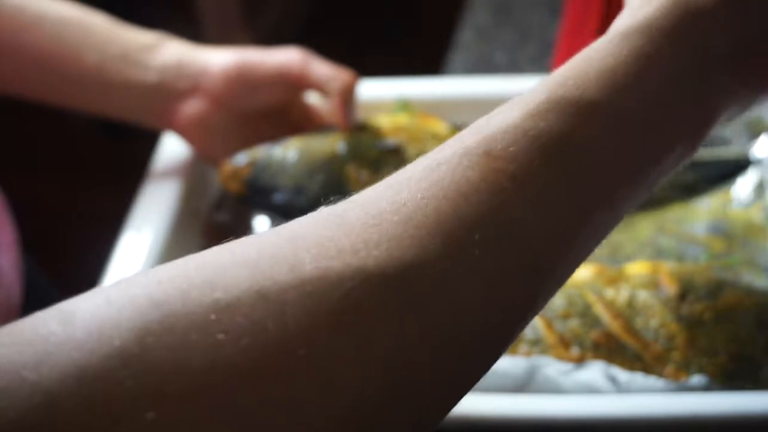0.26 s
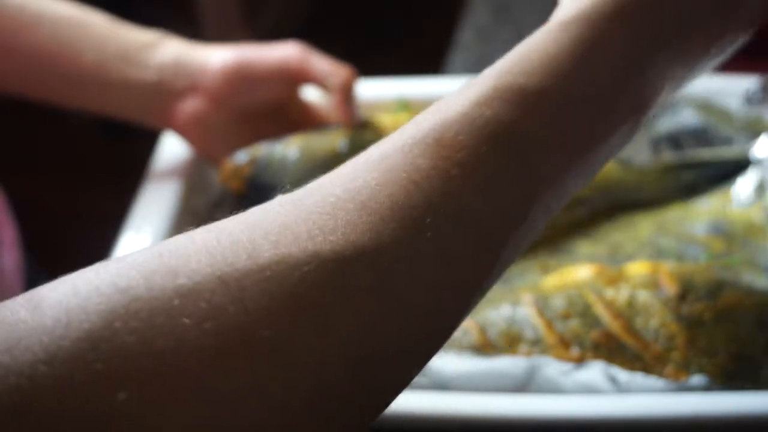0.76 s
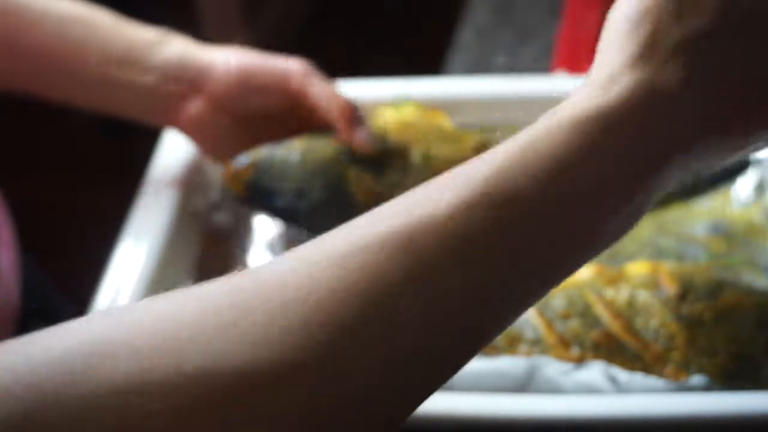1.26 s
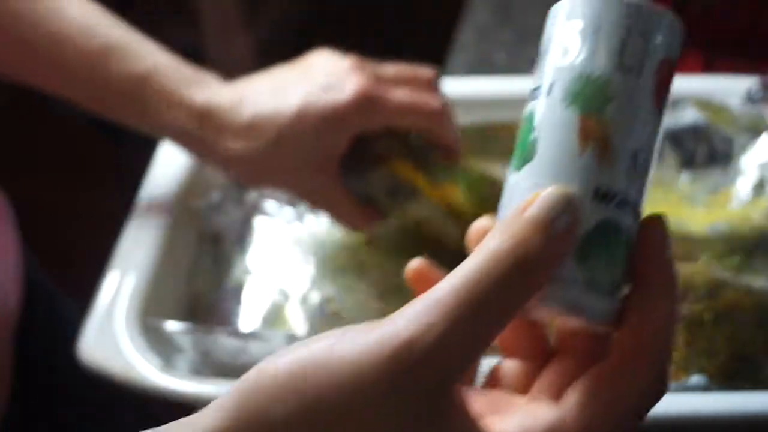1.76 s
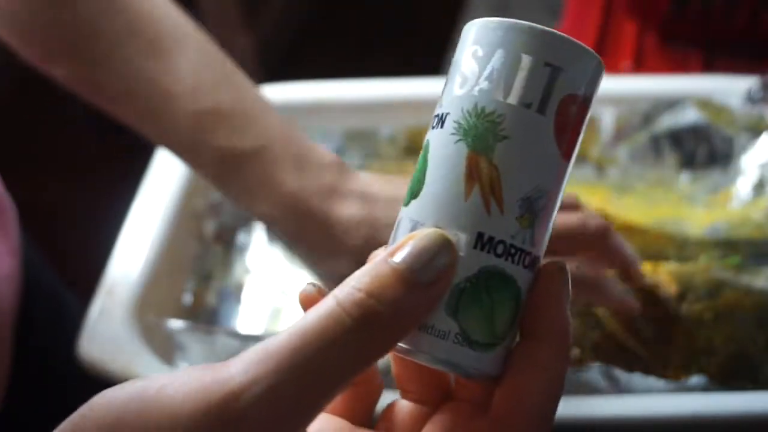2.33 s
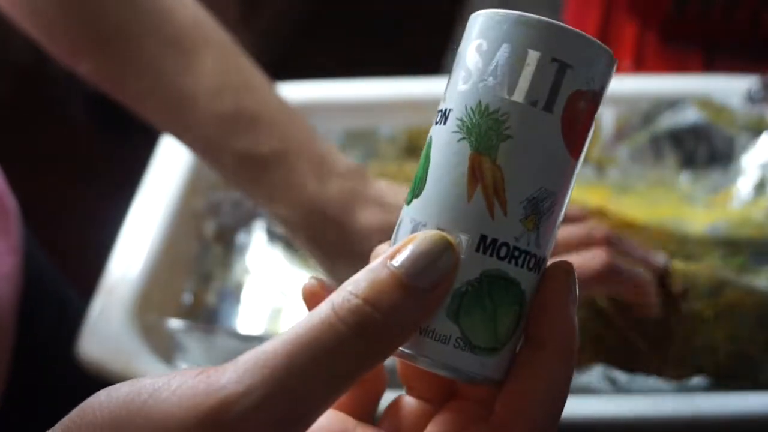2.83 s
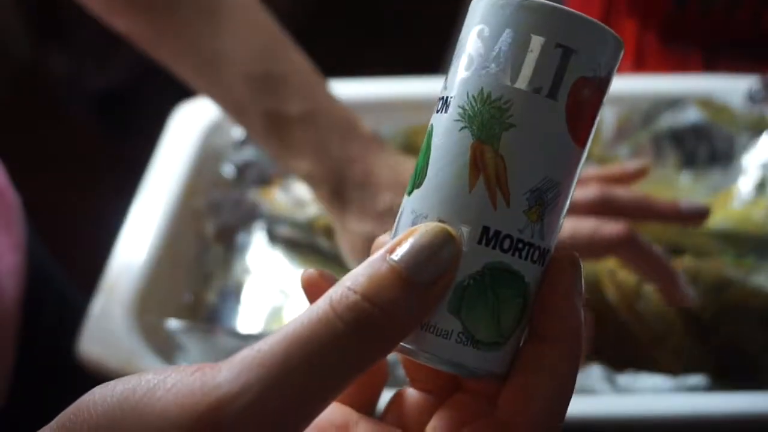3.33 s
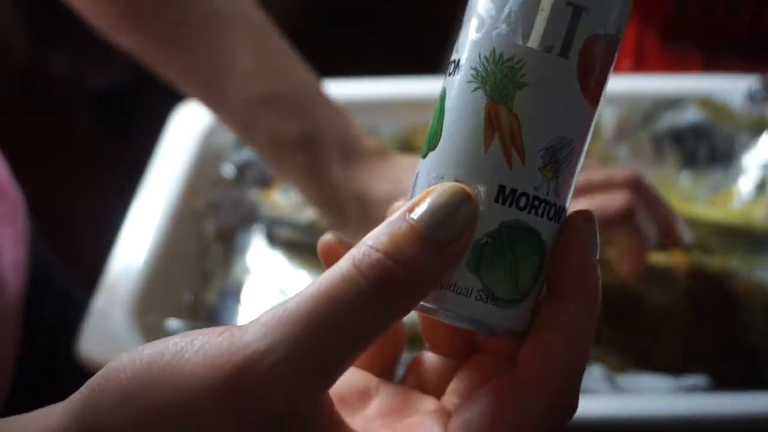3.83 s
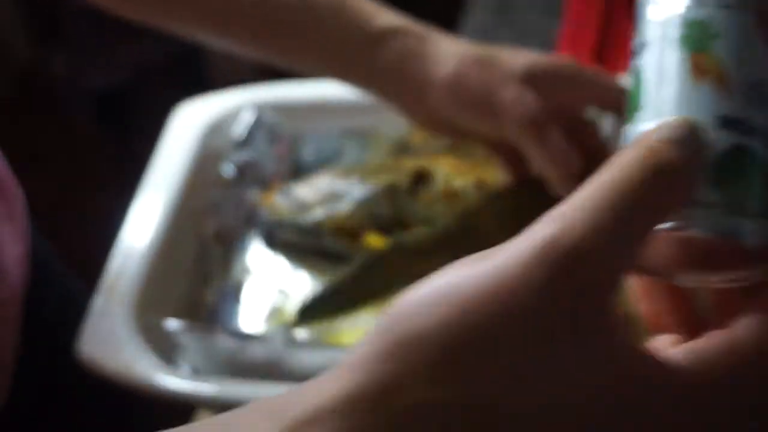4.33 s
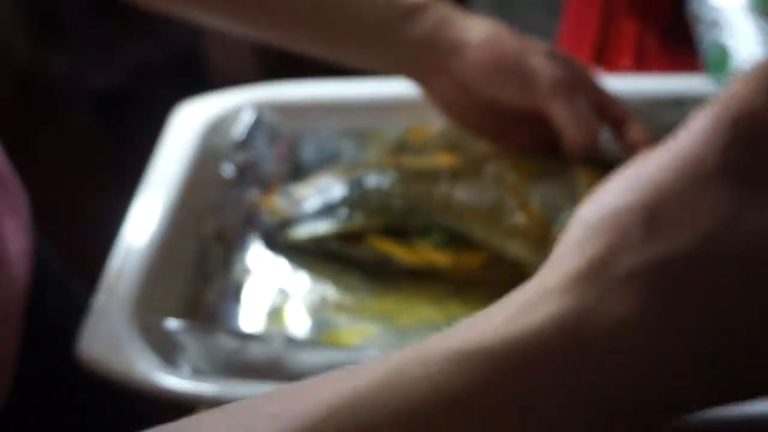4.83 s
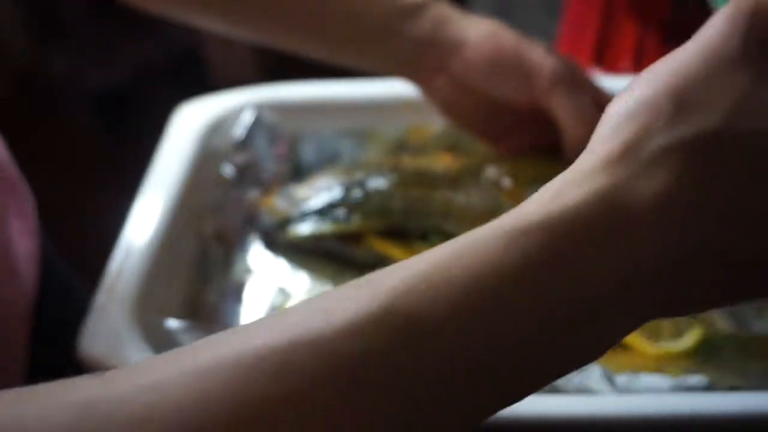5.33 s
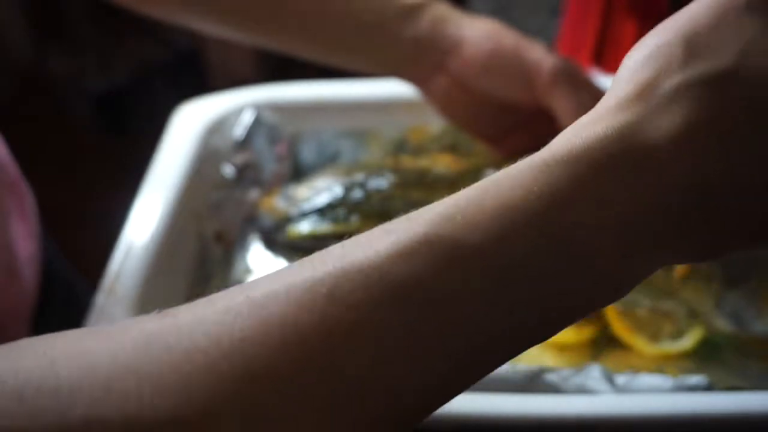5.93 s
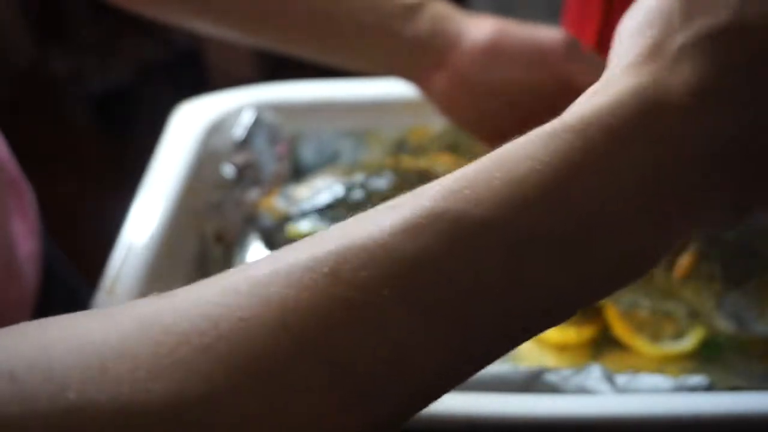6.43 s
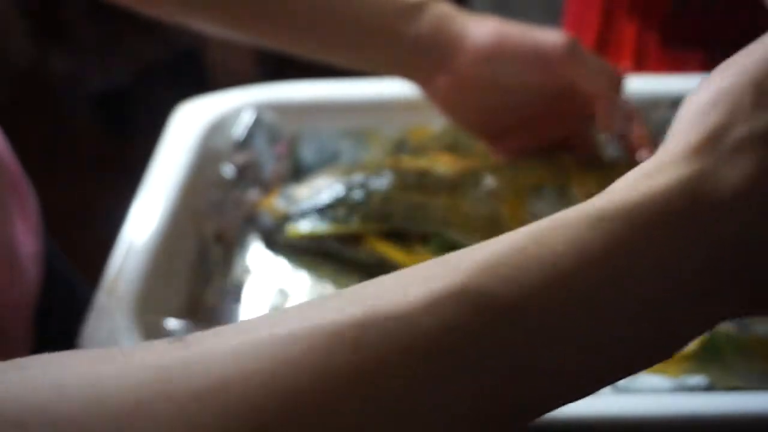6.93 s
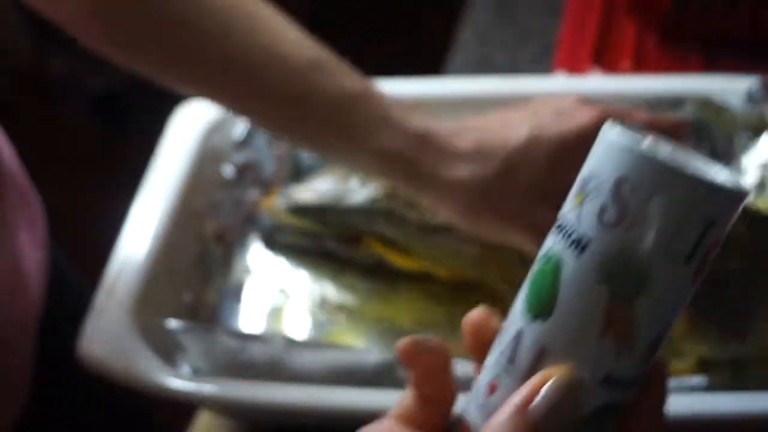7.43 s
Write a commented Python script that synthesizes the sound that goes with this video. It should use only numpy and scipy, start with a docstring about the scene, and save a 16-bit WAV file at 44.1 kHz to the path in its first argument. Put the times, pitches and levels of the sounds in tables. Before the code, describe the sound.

Close kitchen sounds: rhythmic bright salt shaking, crackling wet foil and a heavy soft fish thud, another run of shaking, over a steady appliance hum.

```python
"""In a small kitchen, close by, salt is shaken from a canister over a fish in a foil-lined baking dish.
Grains are dense trains of random impacts: they swish along the canister and slam against its end.
A hand turns the fish twice: the wet foil rustles and snaps as creases excite short facet resonances,
trapped air rings in decaying sines, and the fish drops with a dull slap that wakes the modes of the dish.
An appliance hums in harmonics of its motor's running speed, over rushing air and a low, swelling rumble."""
import sys
import numpy as np
from scipy import signal
from scipy.fft import rfft, irfft, next_fast_len
from scipy.io import wavfile

SR = 44100
rng = np.random.default_rng(int(sys.argv[2]) if len(sys.argv) > 2 else 0)


def transcribe(signal):
    """Save signal, clipped to [-1, 1], as a 16-bit WAV file at the path in sys.argv[1]."""
    frames = np.atleast_2d(signal).T
    limited = np.clip(frames, -1, 1)
    pcm = np.round(limited * 32767).astype(np.int16)
    wavfile.write(sys.argv[1], SR, pcm)


N = 338247
TIME = np.arange(N) / SR


def from_db(db):
    """Decibel law: a level becomes an amplitude factor."""
    return 10 ** (np.asarray(db) / 20)


def rms_one(x):
    """Normalisation to unit effective value."""
    return x / np.sqrt(np.mean(x ** 2) + 1e-20)


def level_at(points, s):
    """Linear interpolation of a (time, level) table."""
    return np.interp(s, *np.transpose(points))


def at_hz(points, hz):
    """Linear interpolation of a spectrum on a logarithmic frequency axis."""
    table_hz, value = np.transpose(points)
    return np.interp(np.log(hz + 1e-3), np.log(table_hz), value)


def drift(per_s):
    """Slow random modulation with a spread of 1, joining chance values by straight lines."""
    knots = rng.standard_normal(4000)
    return np.interp(TIME * per_s, np.arange(len(knots)), knots) * np.sqrt(3 / 2)


def hump(s, db, half_s):
    """Gaussian envelope: a smooth swell around a moment."""
    return from_db(db) * np.exp(-np.minimum(((TIME - s) / half_s) ** 2, 50))


def colour(x, spectrum, likeness):
    """Interaural coherence: unrelated mid and side noises are shaped, then weighted to set the likeness."""
    size = next_fast_len(x.shape[1])
    hz = np.arange(size // 2 + 1) * SR / size
    alike = np.clip(at_hz(likeness, hz), -.99, .99)
    mid, side = rfft(x, size) * rms_one(from_db(at_hz(spectrum, hz)))
    mid = mid * np.sqrt((1 + alike) / 2)
    side = side * np.sqrt((1 - alike) / 2)
    return irfft(np.array([mid + side, mid - side]), size)[:, :x.shape[1]]


def grains(per_s, spread_db):
    """Shot noise: tiny impacts of uneven size at random moments, with unrelated strengths in two signals."""
    sizes = from_db(spread_db * np.minimum(rng.exponential(1, N), 4))
    return rms_one((rng.random(N) < per_s / SR) * sizes * rng.standard_normal((2, N)))


def resonate(x, hz, width_hz):
    """Damped resonator: a two-pole filter with gain 1 at its peak."""
    r = np.exp(-np.pi * width_hz / SR)
    feedforward = [(1 - r * r) / 2, 0, (r * r - 1) / 2]
    feedback = [1, -2 * r * np.cos(2 * np.pi * hz / SR), r * r]
    return signal.lfilter(feedforward, feedback, x)


def add(track, s, sound):
    """Superposition: a sound is mixed in at a given time."""
    start = max(int(s * SR), 0)
    track[..., start:start + sound.shape[-1]] += sound[..., :N - start]


def panned(x, left_db):
    """Level difference as a cue to direction: left_db is left minus right."""
    return x * from_db([[left_db / 2], [-left_db / 2]])


# Harmonics of the motor hum: (multiple of the running speed, relative level [dB])
MOTOR_HARMONICS = [(1, -25.5), (2, -32.5), (3, -27.5), (4, -20.5), (5, -7), (6, 0.5), (7, 0.5), (8, -7),
                   (9, -19.5), (11, -10.5), (13, -10), (14, -20.5)]
# Loudness of the hum: (time [s], level [dB])
MOTOR_LOUDNESS = [(0, -41.5), (1.4, -39.5), (2.2, -43), (3, -41.5), (4.4, -39), (5.5, -40), (6.7, -39.5),
                  (7.67, -40.5)]
# Other steady tones of the appliance: (frequency [Hz], mean rms level [dB])
APPLIANCE_TONES = [(91.5, -61.5), (220.5, -53), (721, -51.5)]
MOTOR_HZ = 59.285  # mean running speed


def motor(waver_db=.5, tone_waver_db=1.0, slip_turns=.004, smear_rad=0.206):
    """Fourier series of one knock per turn: the housing smears the phases, and the hum throbs once a turn."""
    turns = (TIME - .0043) * MOTOR_HZ
    turns = turns + slip_turns * drift(2.07)
    hum = 0
    for k, db in MOTOR_HARMONICS:
        phase = 2 * np.pi * k * turns + smear_rad * (k - 6.5) ** 2
        hum = hum + from_db(db + waver_db * drift(1.82)) * np.cos(phase)
    tones = 0
    for hz, db in APPLIANCE_TONES:
        level = from_db(db + tone_waver_db * drift(1.91))
        tones = tones + level * np.sin(2 * np.pi * hz * TIME + .5 * drift(2.05))
    # the square root of 2 turns rms levels into peak amplitudes
    return np.sqrt(2) * (from_db(level_at(MOTOR_LOUDNESS, TIME)) * hum + tones)


# Spectrum of the rushing air: (frequency [Hz], relative density [dB per Hz])
AIR_SPECTRUM = [(20, -55), (50, -29), (100, -9), (170, -2), (240, 0), (380, 3.5), (520, -1), (780, -4.5),
                (1050, -9.5), (2000, -14.5), (3500, -22), (6000, -23), (8000, -26), (16000, -29)]
# Spectrum of the low rumble: (frequency [Hz], relative density [dB per Hz])
RUMBLE_SPECTRUM = [(15, -16), (30, -15), (48, 18), (65, 14), (100, -10), (250, -50)]
# Left-right likeness of the diffuse background: (frequency [Hz], correlation)
DIFFUSE_LIKENESS = [(30, .99), (70, .96), (300, 0.86), (700, 0.6), (1500, 0.44), (3000, 0), (7000, 0)]
# Rumble between its swells: (time [s], relative level [dB])
RUMBLE_FLOOR = [(0, -58), (1.4, -63), (2.1, -70), (3, -58), (7.67, -57.5)]
# Swells of the rumble: (middle [s], relative level [dB], half length [s])
RUMBLE_SWELLS = [(2.83, -52, .07), (3.32, -44, 0.11), (3.78, -47.5, .17), (4.91, -46, 0.1),
                 (5.95, -53, .08), (6.32, -53, .07), (6.92, -50.5, 0.23)]


def room_tone(air_db=-39.0, rumble_db=-3.5):
    """Broadband flow noise: the appliance's air rushes steadily over a low rumble that comes and goes."""
    air = from_db(air_db) * colour(rng.standard_normal((2, N)), AIR_SPECTRUM, DIFFUSE_LIKENESS)
    swell = from_db(level_at(RUMBLE_FLOOR, TIME)) + sum(hump(*row) for row in RUMBLE_SWELLS)
    rumble = swell * colour(rng.standard_normal((2, N)), RUMBLE_SPECTRUM, DIFFUSE_LIKENESS)
    return air + from_db(rumble_db) * rumble


def kitchen(x, crossover_hz=5000, t60_s=0.32, treble_t60_s=0.27, treble_db=-1.5):
    """Diffuse reverberation: exponentially dying noise, unrelated on the two sides; the treble dies first."""
    age = TIME[:SR // 2]
    white = rng.standard_normal((2, len(age))) * np.minimum(age / 0.0035, 1)
    low_pass = signal.butter(2, crossover_hz, "low", fs=SR, output="sos")
    high_pass = signal.butter(2, crossover_hz, "high", fs=SR, output="sos")
    dull, bright = signal.sosfilt(low_pass, white), signal.sosfilt(high_pass, white)
    fade = from_db(-60 * age / t60_s)
    # the minus sign keeps the two bands from cancelling at the crossover
    tail = dull * fade - bright * from_db(treble_db - 60 * age / treble_t60_s)
    return signal.fftconvolve(x, tail / np.sqrt(np.sum(fade ** 2)), axes=1)[:, :N]


# Left-right likeness of all close sources: (frequency [Hz], correlation)
CLOSE_LIKENESS = [(300, 1), (1300, 0.58), (2500, 0.96), (4000, -0.24), (7000, -0.19), (15000, 0.0086)]
# The fish drops into the dish: (time [s], thud level [dB], wet slap level [dB])
FISH_DROPS = [(2.344, -34, -29), (3.318, -41, -36), (4.829, -24.5, -32), (5.17, -42, -44)]
# Modes of the laden dish: (frequency [Hz], relative level [dB], 60 dB decay time [s])
DISH_MODES = [(204, -6, 0.26), (230, -3, 0.19), (352.4, 5, 0.23), (605, -1, 0.079), (640, 6.5, 0.068)]
# Spectrum of the wet slap: (frequency [Hz], relative density [dB per Hz])
SLAP_SPECTRUM = [(100, -25), (200, -14), (600, 2), (1000, 7), (1400, 1), (3000, -27), (8000, -45)]


def fish_flops(slap_decay_s=0.03, rise_s=0.0022):
    """Modal excitation: the soft weight of the fish slaps dully and wakes the low modes of the dish."""
    out, age = np.zeros((2, N)), TIME[:SR // 2]
    thud = sum(from_db(db - 60 * age / t60) * np.sin(2 * np.pi * hz * age) for hz, db, t60 in DISH_MODES)
    for s, db, slap_db in FISH_DROPS:
        noise = colour(rng.standard_normal((2, len(age))), SLAP_SPECTRUM, CLOSE_LIKENESS)
        slap = noise * np.exp(-age / slap_decay_s)
        add(out, s, (from_db(db) * thud + from_db(slap_db) * slap) * (1 - np.exp(-age / rise_s)))
    return out


# Air pockets pop under the wet fish: (time [s], starting pitch [Hz], level [dB], 60 dB decay time [s])
AIR_POPS = [(1.718, 1224, -24, .08), (2.787, 1474, -36, 0.17), (2.87, 1430, -19, 0.027),
            (2.87, 2870, -24, 0.025), (3.459, 1350, -17.5, 0.072), (3.46, 2075, -19, 0.068),
            (4.222, 1940, -25, .04), (4.491, 1685, -22.5, 0.11), (7.604, 1380, -25, 0.042)]


def air_pockets(glide_per_s=0.2, rise_s=0.0023):
    """Bubble resonance: trapped air rings as a decaying sine that rises slightly in pitch."""
    out, age = np.zeros(N), TIME[:SR // 4]
    for s, hz, db, t60 in AIR_POPS:
        # pitch, the slope of this phase, rises at twice glide_per_s
        ring = np.sin(2 * np.pi * hz * age * (1 + glide_per_s * age))
        add(out, s, from_db(db - 60 * age / t60) * np.minimum(age / rise_s, 1) * ring)
    return out


# How hard the fish drags over the foil, one list per move: lifted and turned over, laid down and
# pressed flat, rolled back, fingers shift, shift again, gripped again: (time [s], relative level [dB])
FISH_DRAG = [
    [(1.22, -35.5), (1.3, -28), (1.4, -37), (1.47, -30), (1.64, -29), (1.76, -34.5), (1.86, -23.5),
     (1.94, -30.5), (2.1, -54)],
    [(2.29, -37.5), (2.35, -31.5), (2.47, -43.5), (2.62, -43), (2.97, -49.5), (3.18, -38), (3.55, -42.5),
     (3.86, -47.5)],
    [(3.93, -41.5), (4.09, -37), (4.27, -47), (4.47, -39.5), (4.65, -43.5), (4.74, -29.5), (4.85, -31.5),
     (5.07, -51)],
    [(5.13, -49), (5.27, -41.5), (5.4, -63)],
    [(6.3, -70), (6.44, -47), (6.52, -56)],
    [(7.25, -37.5), (7.38, -31), (7.5, -71), (7.67, -33)],
]


def drag_db(s):
    """Friction level of the dragging at these times; -120 dB, practically silent, between moves."""
    moves = [np.interp(s, *np.transpose(move), left=-120, right=-120) for move in FISH_DRAG]
    return np.max(moves, axis=0)


# Spectrum of the ringing foil sheet: (frequency [Hz], relative density [dB per Hz])
SHEET_SPECTRUM = [(500, -43), (950, -19), (1350, -2.5), (1700, -3.5), (2000, -3.5), (2600, 0), (3300, -2.5),
                  (4300, -6), (5500, -17), (8000, -21.5), (16000, -49)]
# Spectrum of the bright crack of a crease: (frequency [Hz], relative density [dB per Hz])
CRACK_SPECTRUM = [(2000, -7.5), (4500, 5.5), (7000, 1), (10000, 3), (13000, -0.5), (16000, -4)]


def foil_rustle(body_db=-1.5, crack_db=-7.0, per_s=150, spread_db=1.0, decay_s=0.0098):
    """Crackling noise: many small creases yield under the wet fish, each a dying burst on tuned facets."""
    sizes = from_db(spread_db * np.minimum(rng.exponential(1, N), 3))
    creases = (rng.random(N) < per_s / SR) * sizes
    sheet = colour(rng.standard_normal((2, N)), SHEET_SPECTRUM, CLOSE_LIKENESS)
    power_decay = [1, -np.exp(-2 / (decay_s * SR))]
    facets = 0
    for hz in np.geomspace(1150, 4400, 12):
        woken = creases * (rng.random(N) < 1 / 4)  # each crease wakes a quarter of the facets on average
        bursts = np.sqrt(signal.lfilter([1], power_decay, woken ** 2 + 1e-18))
        facets = facets + bursts * resonate(sheet, hz, width_hz=hz / 8)
    crack = colour(grains(per_s=5000, spread_db=1.5), CRACK_SPECTRUM, CLOSE_LIKENESS)
    return from_db(drag_db(TIME)) * (from_db(body_db) * rms_one(facets) + from_db(crack_db) * crack)


def stray_snaps(per_s=14, above_rustle_db=11.5, spread_db=1.5, treble_db=-15.5,
                facet_hz=1900, facet_octaves=0.38):
    """Random point process: further random snaps while the fish moves, as strong as the drag allows."""
    moment = np.cumsum(rng.uniform(.2, 1.8, 300)) / per_s
    strength, pitch = np.clip(rng.standard_normal((2, len(moment))), -2, 2)
    peak = drag_db(moment) + above_rustle_db + spread_db * strength
    # columns like those of the distinct snaps
    rows = np.transpose([moment, peak, peak + treble_db, facet_hz * 2 ** (facet_octaves * pitch)])
    return rows[(drag_db(moment) > -100) & (moment < N / SR)]


# Distinct snaps of the foil:
# (time [s], relative body level [dB], relative treble level [dB], facet pitch [Hz])
DISTINCT_SNAPS = [(.3616, -15, -36, 1600), (.506, -23, -32.5, 4000), (1.2522, -12.5, -39, 4130),
                  (1.2653, -10.5, -27, 2660), (1.2976, -14, -21.5, 2600), (1.3663, -12, -25, 2240),
                  (1.4227, -7.5, -22, 2430), (1.5537, -13.5, -26, 2450), (1.5927, -8, -20.5, 2720),
                  (1.614, -8, -20.5, 2670), (1.6369, -14.5, -29, 1750), (1.6607, -12, -25, 2420),
                  (1.719, -9.5, -46, 2570), (1.8186, -14, -30, 2940), (1.8574, -12, -23, 2200),
                  (1.918, -11, -22, 2640), (1.9447, -13, -18, 2860), (1.9745, -18, -19.5, 2670),
                  (2.0026, -21, -20.5, 2620), (2.348, -14.5, -24, 2720), (2.389, -14.5, -16.5, 3900),
                  (2.5935, -16.5, -24, 1370), (2.6113, -18, -20, 2250), (2.733, -26, -45, 2720),
                  (2.7857, -18.5, -37, 1480), (2.869, -26, -56, 1370), (2.9322, -31, -41, 3240),
                  (3.0792, -17.5, -40, 2100), (3.1102, -19.5, -35, 1800), (3.1777, -22.5, -35.5, 2350),
                  (3.2896, -23, -50, 2490), (3.3007, -12, -26, 2270), (3.3187, -9, -24.5, 2850),
                  (3.458, -5, -26.5, 2250), (3.5972, -20, -35.5, 3020), (3.722, -22.5, -39, 2040),
                  (3.921, -23, -36.5, 1330), (4.0482, -22, -37, 2600), (4.0684, -22, -31, 2700),
                  (4.1498, -26, -41, 2260), (4.2083, -21.5, -55, 2230), (4.2498, -27, -33, 2720),
                  (4.3312, -22, -54, 3080), (4.4628, -16, -51, 2900), (4.4879, -15, -51, 1620),
                  (4.554, -22, -52, 2230), (4.59, -15.5, -26.5, 3160), (4.7116, -15.5, -28, 2400),
                  (4.7542, -15.5, -27.5, 1160), (4.829, -14, -16.5, 2300), (4.8928, -18, -30, 2130),
                  (7.2861, -15, -26, 2440), (7.5852, -23, -53, 2580), (7.6568, -23, -31.5, 2670)]


def foil_snaps(body_db=-6.5, crack_db=-0.5, facet_share=0.65, facet_width_hz=240, rise_s=.004,
               body_decay_s=0.0089, crack_decay_s=0.01, muffling=0.064):
    """Buckling: a crease gives way with a bright crack; the facet next to it resonates at its own pitch."""
    out, age = np.zeros((2, N)), TIME[:SR // 8]
    attack, since_top = np.minimum(age / rise_s, 1), np.maximum(age - rise_s, 0)
    fade = attack * np.exp(-since_top / body_decay_s)
    crack_fade = attack * np.exp(-since_top / crack_decay_s)
    for s, peak, treble, hz in [*DISTINCT_SNAPS, *stray_snaps()]:
        sheet = colour(rng.standard_normal((2, len(age))), SHEET_SPECTRUM, CLOSE_LIKENESS)
        facet = rms_one(resonate(sheet, hz, facet_width_hz))
        ring = rms_one((sheet + facet_share * facet) * fade) * np.sqrt(np.mean(fade ** 2))
        # a crease buried under the fish keeps little of its crack, and that little is duller
        muffled = [(f, db - muffling * (peak - treble) * np.log2(f)) for f, db in CRACK_SPECTRUM]
        crack = colour(rng.standard_normal((2, len(age))), muffled, CLOSE_LIKENESS) * crack_fade
        snap = from_db(peak + body_db) * ring + from_db(treble + crack_db) * crack
        add(out, s - rise_s / 2, snap)
    return out


# Runs of even, gentle shaking: (first swish [s], last swish [s])
SHAKING_RUNS = [(0.189, 1.235), (4.978, 6.52)]
# Time from swish to swish, one value per run: (period [s])
SWING_PERIODS = [.1048, .0963]
# Vigour of the shaking as the level of its swishes, one list per run: (time [s], relative level [dB])
SHAKING_VIGOUR = [
    [(.18, -34), (.29, -39), (.42, -29), (.65, -36.5), (.95, -33), (1.23, -30.5)],
    [(4.98, -26.5), (5.08, -34.5), (5.27, -32), (5.93, -38), (6.05, -31.5), (6.33, -34), (6.52, -30)],
]
# Single swishes of salt outside the even runs, some from a last short shake:
# (middle [s], relative level [dB], half length [s])
SINGLE_SWISHES = [(.02, -41.5, .04), (1.59, -25.5, 0.028), (4.755, -32.5, .035), (6.84, -29, 0.11),
                  (6.944, -21, 0.029), (7.027, -29, 0.051), (7.41, -24, 0.021)]
# Spectrum of sliding salt: (frequency [Hz], relative density [dB per Hz])
SLIDE_SPECTRUM = [(1000, -15), (2000, -10.5), (2900, -8), (4300, -6), (5500, -10), (7500, -6.5),
                  (10000, -2), (13500, 1.5), (15600, -2), (17000, 2)]


def salt_swishes(level_db=1.5, half_s=0.033):
    """Granular flow: each swing sends grains along the wall in a soft, bright swish, louder with vigour."""
    swishes = list(SINGLE_SWISHES)
    for (first, last), period, vigour in zip(SHAKING_RUNS, SWING_PERIODS, SHAKING_VIGOUR):
        for s in np.arange(first, last + period / 2, period):
            swishes.append((s, level_at(vigour, s), half_s))
    flow = sum(hump(s, db + level_db, half) for s, db, half in swishes)
    return flow * colour(grains(per_s=5000, spread_db=0.0), SLIDE_SPECTRUM, CLOSE_LIKENESS)


# On hard strokes the salt lands on the end of the canister:
# (time [s], relative level [dB], settling time [s])
SALT_LANDINGS = [(0.353, -18.5, 0.033), (.621, -16, 0.014), (0.843, -13.5, .01), (1.036, -14, 0.012),
                 (1.245, -18.5, 0.035), (1.444, -20.5, 0.035), (6.573, -25, 0.043), (6.732, -15.5, 0.027),
                 (7.052, -22.5, 0.066), (7.259, -20, 0.094)]
# Small clumps of salt tick in the canister: (time [s], relative level [dB])
CLUMP_TICKS = [(.183, -24), (.487, -22), (.717, -17), (1.146, -13.5), (6.005, -25), (6.03, -24.5),
               (6.197, -29), (6.377, -25), (6.558, -23), (6.72, -22), (7.404, -16)]
# Spectrum of slamming salt: (frequency [Hz], relative density [dB per Hz])
SLAM_SPECTRUM = [(700, -60), (1200, -17), (1700, -10.5), (2800, -3.5), (4200, -3.5), (5500, -6),
                 (7000, -5.5), (10000, 0), (13500, 2), (15600, 0.5), (17000, -2)]


def salt_slams(rise_s=0.0076, pour_s=.016, pour_per_settling=0.33, tick_decay_s=0.0037,
               clumping_db=1.25, clumps_per_s=260):
    """Granular impact: the heap lands, then stragglers settle exponentially; clumps give lone ticks."""
    flow, age = np.zeros(N), TIME[:SR // 2]
    for s, db, settling in SALT_LANDINGS:
        pour = pour_s + pour_per_settling * settling  # a looser heap pours for longer
        landing = np.minimum(age / rise_s, 1) * np.exp(-np.maximum(age - pour, 0) / settling)
        add(flow, s, from_db(db) * landing)
    flow = flow * from_db(clumping_db * drift(clumps_per_s))  # the salt arrives unevenly
    for s, db in CLUMP_TICKS:
        add(flow, s, from_db(db) * np.exp(-age / tick_decay_s))
    return flow * colour(grains(per_s=9200, spread_db=0.5), SLAM_SPECTRUM, CLOSE_LIKENESS)


def scene():
    """Direct and reverberant sound: canister and dish, a little to the right, both excite the kitchen."""
    background = panned(motor(), left_db=-.5) + room_tone()
    slams = panned(salt_slams(), left_db=-2.0) * from_db(0.5)
    slides = panned(salt_swishes(), left_db=-2.5)
    foil = fish_flops() + panned(air_pockets() + foil_rustle() + foil_snaps(), left_db=-2.5)
    echoes = kitchen(from_db(-5.0) * slams + from_db(-5) * slides + from_db(-5.5) * foil)
    return slams + slides + foil + echoes + background


def record(dry, cutoff_hz=15900):
    """Band limiting: a steep elliptic low-pass cuts the top."""
    low_pass = signal.ellip(12, .1, 80, cutoff_hz, fs=SR, output="sos")  # ripple and stopband in dB
    return signal.sosfilt(low_pass, dry)


dry = scene()
out = record(dry)
transcribe(out)
```